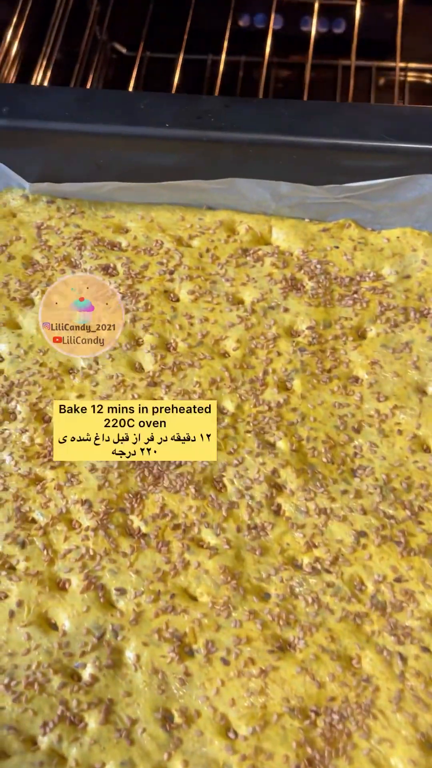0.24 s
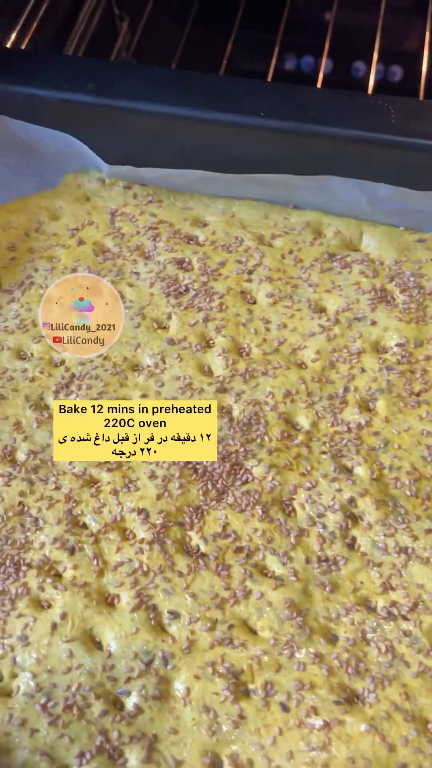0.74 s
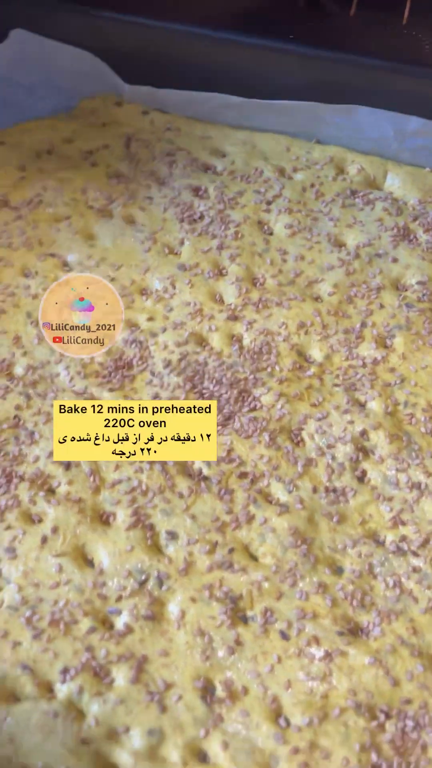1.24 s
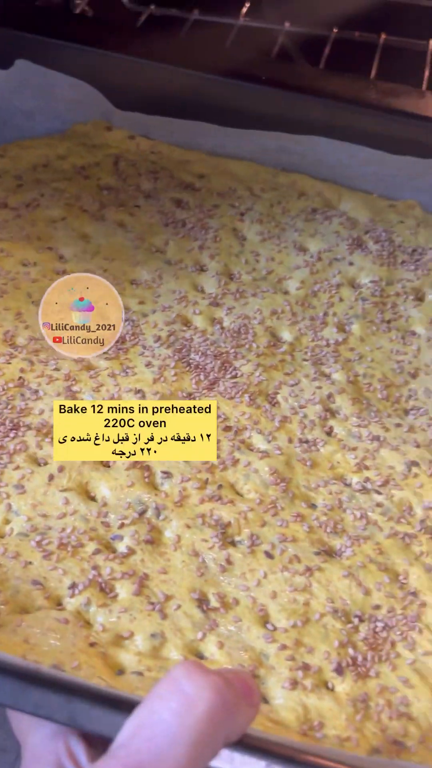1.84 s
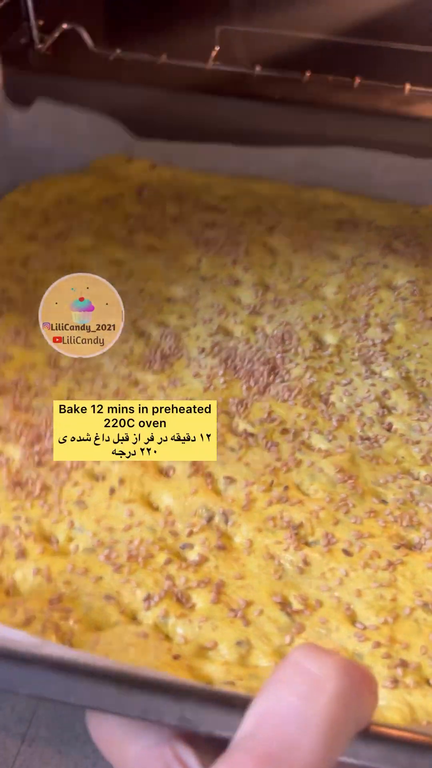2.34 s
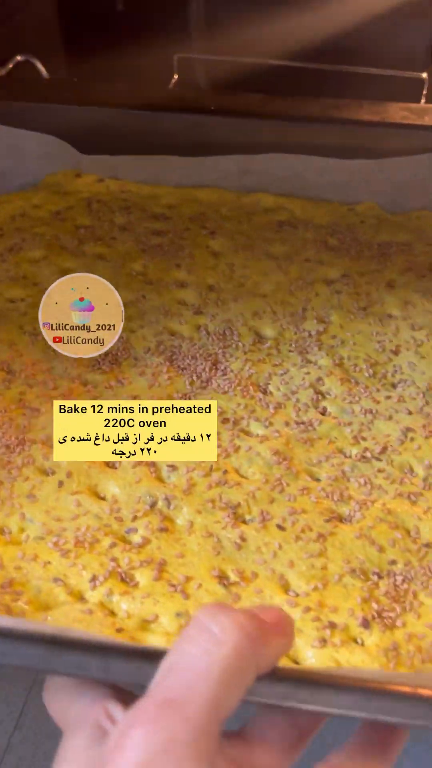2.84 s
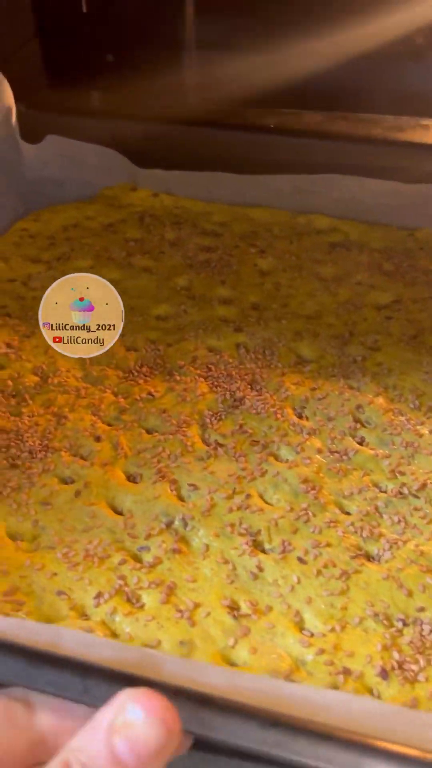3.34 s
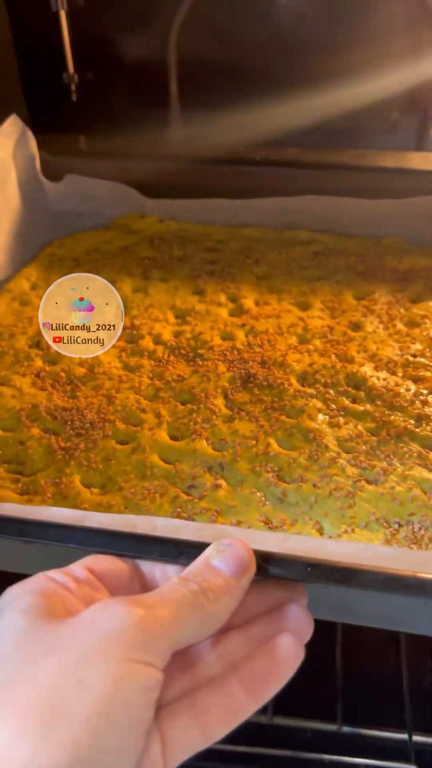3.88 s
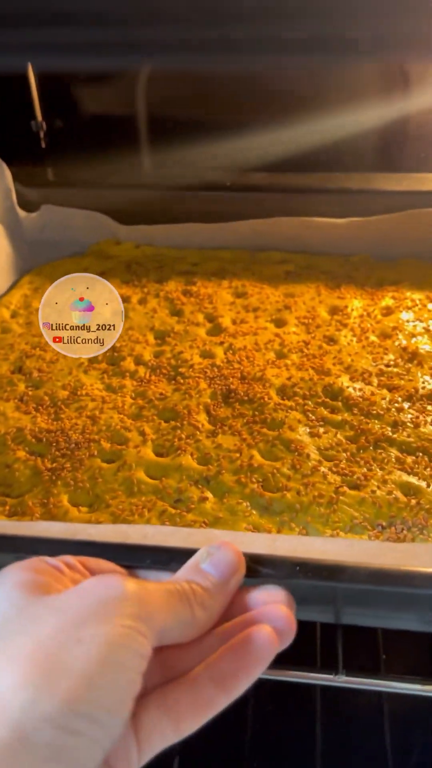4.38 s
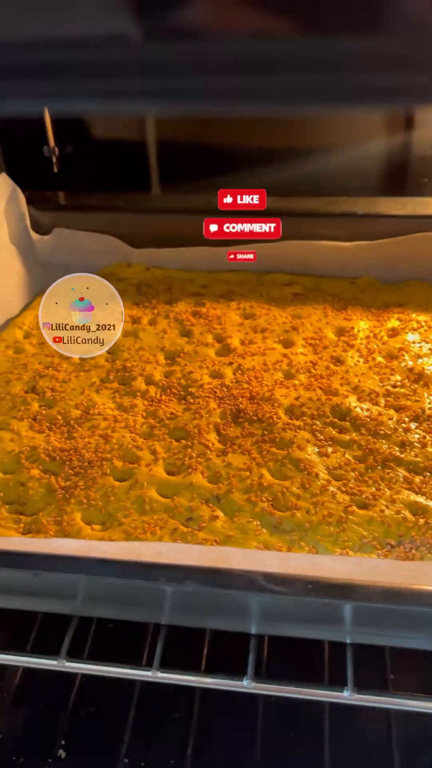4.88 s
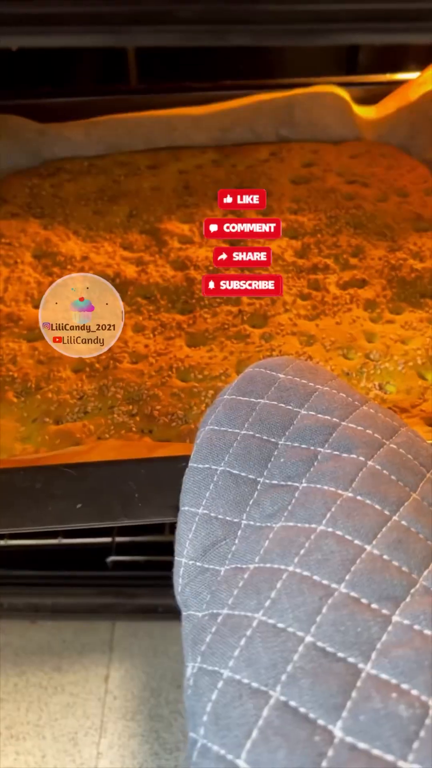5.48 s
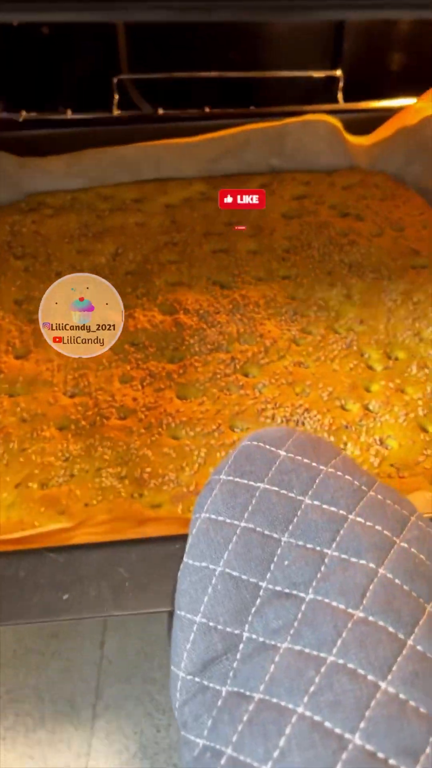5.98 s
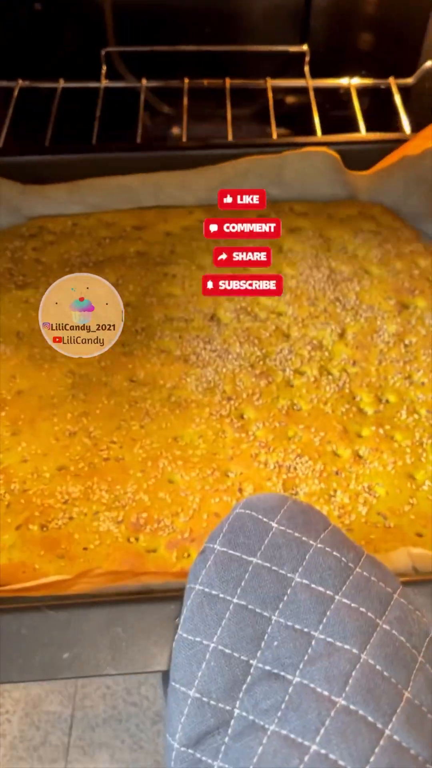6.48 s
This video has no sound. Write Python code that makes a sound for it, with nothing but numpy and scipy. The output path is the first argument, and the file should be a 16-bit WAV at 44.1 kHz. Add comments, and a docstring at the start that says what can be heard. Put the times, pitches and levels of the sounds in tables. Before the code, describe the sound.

A close handheld phone hears an open oven in a home kitchen. Quiet fan air, low rumble and faint wavering whistles run throughout, swelling with the wash of the blows. Two faint ticks come before 1 s. From 1.2 to 2.0 s a loaded metal tray clatters on the rack in a quick uneven run, with a hard hollow clank near 1.7 and a sharper one with a short scrape near 1.86. At 2.3 to 2.65 s comes the loudest burst: bangs, a bright gritty slide and deep oven boom. Tiny taps follow around 3.0 and 3.3. At 3.6 to 3.7 s a heavy dull thud lands with a low rumbling slide, then smaller knocks at 4.1 to 4.25. Fan noise dominates, with a soft low bump at 5.1 and a barely audible scrape at 5.9. Light clanks and short scrapes close it from 6.4 to 6.65.

```python
"""Loaded baking tray on an oven rack

A loaded tray is set on the rack, knocked, slid in and later drawn out, close to a handheld phone.
Blows ring the dense modes of the tray sheet and boom in the few low modes of rack and oven.
Slides drive the same modes with random stick-slip contacts.
Behind them, shaped noise with whistling bands gives the rumble, roar and hiss of the oven fan
through the open door, together with the reverberant wash after blows.
"""
import sys
import numpy as np
from scipy import signal
from scipy.io import wavfile
from scipy.ndimage import uniform_filter1d

SR = 44100
rng = np.random.default_rng(int(sys.argv[2]) if len(sys.argv) > 2 else 0)


def write(x):
    x = np.atleast_2d(x).T
    wavfile.write(sys.argv[1], SR, np.round(np.clip(x, -1, 1) * 32767).astype(np.int16))


N = 296352

# Blows of tray on rack. Each row: start in seconds, clank level in dB, boom level in dB,
# hardness (spectral tilt) in dB per octave, ring length as a factor, boom centre in Hz, favoured tone in Hz.
BLOW_EVENTS = [(0.463, -46.5, -47, 6, 0.86, 121, 4220), (0.885, -42, -35, 3.5, 0.74, 106, 4930),
               (1.213, -24, -20, 2, 1.13, 106, 3460), (1.368, -21.5, -21, 1.05, 1.07, 92.6, 523),
               (1.475, -28, -28.5, -2.5, 0.94, 372, 2600), (1.558, -26, -25.5, -2.5, 0.76, 102, 2340),
               (1.646, -32.5, -20.5, -4, 0.75, 105, 840), (1.675, -8.5, -19.5, 1, 0.62, 350, 371),
               (1.733, -24, -21.5, -0.5, 0.79, 219, 4200), (1.772, -25.5, -29, 0.5, 0.76, 135, 4250),
               (1.798, -24.5, -25, 0.4, 0.86, 94, 4220), (1.857, -13.5, -19, -0.7, 0.66, 105, 1320),
               (1.904, -25.5, -36, 1, 0.85, 320, 2400), (2.016, -30.5, -58, -4, 2.1, 333, 2280),
               (2.088, -37.5, -53, 7, 2.5, 213, 6400), (2.289, -10.5, -18, -2.5, 0.35, 440, 845),
               (2.328, -11, -7.5, 1, 0.32, 86, 8720), (2.345, -17, -8.5, 12, 0.81, 170, 4950),
               (2.391, -14.5, -19, 3, 0.86, 86, 4720), (2.436, -13.5, -18, 5.5, 4.6, 89, 8170),
               (2.501, -16, -15, 5.5, 0.78, 268, 1020), (2.645, -24, -41, -2, 0.74, 385, 4600),
               (2.963, -37, -39, -3, 0.67, 107, 1470), (3.001, -36.5, -35, 3, 0.87, 396, 4500),
               (3.053, -40, -36, -1.5, 2.2, 108, 2480), (3.343, -36.5, -29.5, -4.5, 0.73, 104, 2120),
               (3.608, -23, -14, 0, 0.89, 107, 1350), (3.682, -11, -7, -3.5, 1.07, 101, 246),
               (3.765, -32, -31, 4.5, 1.5, 88, 8500), (4.133, -24, -19, 3, 0.8, 101, 730),
               (4.185, -29, -24, -2.5, 0.65, 119, 2760), (4.245, -38, -43, -5, 0.77, 118, 2400),
               (5.116, -33, -25.5, -4.5, 1.25, 164, 446), (5.173, -41, -24, -6, .7, 138, 590),
               (6.412, -33, -38, 0.5, 0.54, 124, 1120), (6.447, -23, -20.5, 1.5, 1.65, 255, 2647),
               (6.525, -24.5, -18.5, -2, 1, 150, 4360), (6.645, -27, -30, -4, 0.66, 242, 1010)]


def blows(modes, tone_lift_db=12.5):
    """Each knock rings the sheet (clank) and the rack (boom); the spot struck favours one tone."""
    out = np.zeros((2, N))
    for start_s, clank_db, boom_db, hardness_db_per_oct, length, boom_hz, tone_hz in BLOW_EVENTS:
        sheet_ring = clank(modes, hardness_db_per_oct, length, (tone_hz,), tone_lift_db)
        add(out, start_s, gain_of(clank_db) * sheet_ring)
        add(out, start_s, gain_of(boom_db) * boom(boom_hz, length=1))
    return out


# Ring of the tray sheet before hand and load shorten it. Each row: frequency in Hz, t60 in seconds.
SHEET_FREE_T60 = [(300, 0.66), (1000, 0.69), (3000, 0.55), (7000, 0.16), (14000, 0.21)]


def sheet_modes(count=600, length_samples=12000):
    """The dense, evenly spread modes of the tray sheet as dying rotations."""
    hz = 250 + 15800 * (np.arange(count) + rng.random(count)) / count
    t = np.arange(length_samples) / SR
    rate = 2j * np.pi * hz - np.log(1000) / read(SHEET_FREE_T60, hz)
    return hz, np.exp((rate[:, None] * t).astype(np.complex64))


# Tray clank spectrum as heard, with a gap near 12-14 kHz that is not the tray's own.
# Each row: frequency in Hz, relative level in dB per mode.
CLANK_SPECTRUM = [(120, -29), (200, 6.5), (867, -2), (1100, -2), (1450, -5), (2610, -6), (4040, -9.5),
                  (4770, -10.5), (5230, -10), (9750, -11), (11500, -17), (12800, -35.5), (16000, -28.5)]
# Groups of sheet modes that stand out. Each row: centre in Hz, width in Hz, lift in dB.
SHEET_GROUPS = [(1160, 69, 0.5), (1760, 40, 1.5), (2590, 100, 4), (3370, 80, 0.5), (4300, 49, -0.5),
                (4720, 180, 5.5), (6040, 76, -3), (7900, 150, 2)]


def clank(modes, hardness_db_per_oct, length, tones_hz=(), tone_lift_db=0, scatter_db=2.5, crack=.6):
    """One contact rings every sheet mode by chance, after a short crack; hand and load shorten the ring."""
    hz, rings = modes
    lift_db = sum(db * hump(hz, f, width) for f, width, db in SHEET_GROUPS)
    lift_db = lift_db + sum(tone_lift_db * hump(hz, f, 70 + 0.017 * f) for f in tones_hz)
    a, b, c, d, chance = rng.standard_normal((5, len(hz)))
    tilt_db = hardness_db_per_oct * np.log2(hz / 2000)
    size = gain_of(read(CLANK_SPECTRUM, hz) + lift_db + tilt_db + scatter_db * chance)
    strengths = size * ports(hz, a + 1j * b, c + 1j * d)
    sound = (strengths.astype(np.complex64) @ rings).real
    t = np.arange(sound.shape[1]) / SR
    damping = np.exp(-t / (0.044 * length ** 2))
    onset = (1 - np.exp(-t / 0.00078)) * (1 + crack * np.exp(-t / 0.0012))
    return sound * damping * onset / np.sqrt(np.sum(size ** 2))


# Modes of rack and oven walls. Each row: frequency in Hz, relative level in dB, t60 at length 1 in seconds.
RACK_MODES = [(73, -1.5, 0.29), (92.9, -2.5, 0.49), (116.8, -2, 0.28), (141.7, -4, 0.42),
              (181.2, -2.5, 0.28), (226.3, -3, 0.31), (252.8, -6, 0.43), (323, -20, 0.099),
              (388.2, -4, 0.17), (428, -28, 0.27), (521.5, -13, 0.36), (632, -24, 0.16), (694, -10.5, 0.64)]


def boom(centre_hz, length, focus_db_per_oct=16.5, loose_turns=0.27, swing_s=.02):
    """Rack and oven walls take up a blow slowly and ring low, favouring modes near the centre pitch."""
    hz, db, t60_s = np.transpose(RACK_MODES)[:, :, None]
    db = db - focus_db_per_oct * abs(np.log2(hz / centre_hz))
    t = np.arange(22000) / SR
    # modes fall nearly in step at swing_s, the first full swing
    turn = loose_turns * rng.random((len(RACK_MODES), 1))
    swings = np.cos(2 * np.pi * (hz * (t - swing_s) + turn))
    rings = gain_of(db - 60 * t / (t60_s * length)) * swings
    take_up = (1 - np.exp(-t * 160)) ** 2
    return rings.sum(0) * take_up / np.linalg.norm(gain_of(db))


# Strokes of sliding. Each row: start in seconds, hold in seconds, scrape level in dB, rumble level in dB,
# scrape fade in dB per second, brightness before the fade from 0 to 1, rumble centre in Hz.
SLIDE_STROKES = [(1.856, 0.024, -20, -26.5, 172, 0.52, 200), (2.268, 0.033, -24.5, -18, 350, 0.13, 150),
                 (2.326, 0.18, -16, -24.5, 183, 0.84, 160), (2.543, 0.029, -23.5, -28, 230, 0.78, 200),
                 (2.64, 0.015, -34.5, -29, 164, 0.07, 160), (3.69, 0.13, -35.5, -25, 218, 0.12, 117),
                 (4.191, 0.017, -43, -30.5, 175, 0.3, 126), (5.11, 0.0089, -42, -35.5, 161, 0.9, 145),
                 (5.87, .04, -44, -47.5, 248, 0.53, 126), (6.405, 0.017, -31.5, -47, 304, 0.77, 190),
                 (6.446, .015, -26, -28, 220, .5, 245), (6.52, 0.064, -38.5, -30.5, 200, 0, 153)]


def slides(modes, slips_per_s=800, uneven_db=5.5, stutter_db=3.0):
    """Tiny stick-slip contacts in clumps at three points of the tray bottom; the rack rumbles along."""
    rise_s, fade_span_db = 0.0088, 30.5
    dulling_per_db, rumble_fade_share = 0.14, 0.66
    booms_hz = [85, 150, 270]
    count = len(booms_hz)
    out = np.zeros((2, N))
    for start_s, hold_s, top_db, low_db, fade_db_per_s, shine, rumble_hz in SLIDE_STROKES:
        t = np.arange(0, rise_s + hold_s + fade_span_db / fade_db_per_s, 1 / SR)
        faded_db = fade_db_per_s * np.maximum(t - rise_s - hold_s, 0)
        scrape_db, rumble_db = top_db - faded_db, low_db - rumble_fade_share * faded_db
        bright = np.clip(shine - dulling_per_db * faded_db, 0, 1)
        rise = np.minimum(t / rise_s, 1)
        # 1 = deep wall modes, 0 = rack wires
        depth = np.clip(np.log2(300 / rumble_hz) / np.log2(300 / 85), 0, 1)
        # the grip of the whole tray stutters, so all contact points swell together
        stutter = uniform_filter1d(rng.standard_normal(len(t)), 250)
        stutter = evened(uniform_filter1d(stutter, 250))
        for k, boom_hz in enumerate(booms_hz):
            sizes_db = uneven_db * np.minimum(rng.exponential(1, len(t)), 3) + stutter_db * stutter
            slips = gain_of(sizes_db) * (rng.random(len(t)) < slips_per_s / SR)
            slips = evened(slips * rng.choice([-1., 1.], len(t))) * rise / np.sqrt(count)
            # each contact favours its own tones
            tones_hz = rng.uniform([400, 1500, 4000], [1500, 4000, 9000])
            hard = clank(modes, 1.26, 0.55, tones_hz, 7.1)
            soft = clank(modes, -3.65, 0.87, tones_hz, 2.9)
            for share, ring in (bright, hard), (1 - bright, soft):
                drive = slips * gain_of(scrape_db) * np.sqrt(share)
                scrape = signal.fftconvolve(drive[None], ring / np.linalg.norm(ring[0]), axes=1)
                add(out, start_s, scrape)
            ring = boom(boom_hz, 0.52, focus_db_per_oct=11.0)
            share = np.maximum(1 - abs(2 * depth - 2 + k), .05)
            drive = slips * gain_of(rumble_db) * np.sqrt(count * share)
            add(out, start_s, signal.fftconvolve(drive, ring / np.linalg.norm(ring)))
    return out


# Background level: fan air noise together with the reverberant wash after blows.
# Each row: time in seconds, roar in dB, hiss in dB.
BACKGROUND_LEVELS = [(0, -60, -56), (.4, -58.5, -52.5), (1.1, -53, -48.5), (1.7, -41.5, -46),
                     (2.2, -42.5, -47.5), (2.8, -40, -45), (3.2, -47, -46), (3.6, -44.5, -45.5),
                     (4.2, -46, -49.5), (5.0, -48, -47.5), (5.35, -46.5, -50), (5.75, -46.5, -45.5),
                     (6.3, -51, -47.5), (6.72, -41, -46)]
# Rumble, roar and hiss as heard; the hiss has a gap near 12-14 kHz that is not the fan's own.
# Each row: frequency in Hz, relative level in dB per Hz.
RUMBLE_AS_HEARD = [(15, -45.5), (25, -20), (40, -7), (92, 3.5), (146, -8), (178, -4), (239, -7.5),
                   (279, -13.5), (300, -23), (390, -48.5), (660, -120)]
ROAR_AS_HEARD = [(130, -11), (220, 3.5), (246, -4), (284, -3), (457, -6), (550, -11), (720, -10.5),
                 (884, -17.5), (1200, -19.5), (1560, -38), (2640, -120)]
HISS_AS_HEARD = [(530, -43), (900, -7), (1410, -3), (1790, -1.5), (2120, -3), (2660, 1), (3430, -3.5),
                 (4310, -3.5), (10000, 0.5), (11700, -6.5), (12400, -35), (14200, -12), (16000, -7.5)]
# Whistling bands of the fan housing. Each row: mean centre in Hz, width in Hz,
# mean lift far from the door in dB, mean lift near it in dB.
WHISTLES = [(102, 31, 7.5, 2), (430, 50, -0.5, 2), (594, 26, 17, 3), (673, 26, 10.5, 4),
            (823, 29, 12.5, -2.5), (1754, 69, 13.5, 6.5), (1990, 64, 4, 5), (2415, 175, 2.5, 6.5),
            (2698, 54, 9.5, 13.5), (2883, 54, 14.5, 5), (2940, 39, 6, 9), (4084, 79, 7.5, 9),
            (4345, 57, 15.5, 14.5), (6470, 140, -4, 5.5), (8540, 130, 3, 5.5), (10070, 150, 9.5, 6.5)]
# The phone nears the door. Each row: time in seconds, nearness from 0 to 1.
NEARNESS = [(.6, 0), (4.4, 1)]


def fan_and_wash(patchy_db=1.5, gusty_db=1.64, waver=0.0091, flutter=0.21):
    """Noise of fan air and wash: lumpy rumble, roar and hiss; wavering whistles shift with nearness."""
    window, hop = 2048, 512
    frames, hz = N // hop + 5, np.fft.rfftfreq(window, 1 / SR)[:, None]
    t = np.arange(frames) * hop / SR
    s, *columns = np.transpose(BACKGROUND_LEVELS)
    roar_db, hiss_db = (np.interp(t, s, c) for c in columns)
    rumble_db = -42.5 + 0.53 * (roar_db + 48)  # follows the roar by a share
    near = np.interp(t, *np.transpose(NEARNESS))

    a, b, c, d, patches = rng.standard_normal((frames, len(hz), 5)).T
    patches = evened(uniform_filter1d(uniform_filter1d(patches, 16, 0), 7, 1))
    gusts = evened(uniform_filter1d(rng.standard_normal(frames), 5))
    drift, swell = (evened(uniform_filter1d(rng.standard_normal((len(WHISTLES), frames)), 15))
                    for _ in range(2))

    lift_db = 0
    for k, (centre_hz, width_hz, far_db, near_db) in enumerate(WHISTLES):
        band_db = (far_db + near * (near_db - far_db)) * (1 + flutter * swell[k])
        lift_db = lift_db + band_db * hump(hz, centre_hz * (1 + waver * drift[k]), width_hz)

    power = 0
    for spectrum, db in ((RUMBLE_AS_HEARD, rumble_db + gusty_db * gusts),
                         (ROAR_AS_HEARD, roar_db + .5 * gusty_db * gusts),
                         (HISS_AS_HEARD, hiss_db)):
        colour = gain_of(read(spectrum, hz) + lift_db)
        colour = colour / np.sqrt(np.mean(np.sum(colour ** 2, 0)))
        power = power + (colour * gain_of(db)) ** 2

    def to_sound(z):
        return signal.istft(z, nperseg=window, noverlap=window - hop)[1]

    unit = np.std(to_sound((a + 1j * b) / np.sqrt(len(hz))))
    z = ports(hz, a + 1j * b, c + 1j * d) * np.sqrt(power) * gain_of(patchy_db * patches) / unit
    return to_sound(z)[:, :N]


# The two microphone ports. Each row: frequency in Hz, left-right likeness from 0 to 1,
# phase by which the right leads in radians.
PORT_PAIR = [(60, 1.0, 0.0), (200, 0.99, 0.052), (350, 0.99, -0.051), (700, 0.85, 0.077),
             (1190, 0.6, -0.013), (1720, 0.93, 0.25), (2180, 1, -1.3), (2610, 0.71, -0.084),
             (3500, 0.14, -0.91), (3950, 0.74, 0.032), (5730, 0.36, 1.26), (7000, 0.88, 1.19),
             (9550, 0.73, 1.41), (12400, 0.24, 0.83), (14500, .5, 1.8)]


def ports(hz, left, other):
    """Left and right spectra: partly alike, with a phase step between the ports."""
    f, same, lead_rad = np.transpose(PORT_PAIR)
    same = np.clip(read(np.c_[f, same], hz), 0, 1)
    lead_rad = read(np.c_[f, lead_rad], hz)
    right = same * left * np.exp(1j * lead_rad) + np.sqrt(1 - same ** 2) * other
    return np.array([left, right])


def gain_of(db):
    """Decibels to gain."""
    return 10 ** (np.asarray(db) / 20)


def evened(x):
    """Scales to rms 1."""
    return x / np.sqrt(np.mean(x ** 2) + 1e-20)


def read(points, hz):
    """Reads a table on a log-frequency axis."""
    f, value = np.transpose(points)
    return np.interp(np.log(hz + 1), np.log(f + 1), value)


def hump(hz, centre_hz, width_hz):
    """A resonance shape of height 1."""
    return 1 / (1 + (2 * (hz - centre_hz) / width_hz) ** 2)


def add(mix, start_s, sound):
    """Mixes a one- or two-channel sound into both channels at start_s."""
    part = mix[:, round(start_s * SR):][:, :sound.shape[-1]]
    part += sound[..., :part.shape[1]]


def scene():
    """Tray and rack over the fan and wash."""
    modes = sheet_modes()
    return blows(modes) + slides(modes) + fan_and_wash()


# The level dips briefly. Values: centre in seconds, width in seconds, depth in dB.
LEVEL_DIP = (5.315, .012, -9)


def record(dry, bass_edge_hz=48, overload=1.6, top_edge_hz=16100):
    """A brief dip in level, the microphone's bass roll-off, a soft overload and the band limit."""
    dip_s, width_s, dip_db = LEVEL_DIP
    t = np.arange(N) / SR
    dipped = dry * gain_of(dip_db * np.exp(-((t - dip_s) / width_s) ** 2))
    thinned = signal.sosfilt(signal.butter(2, bass_edge_hz, "high", fs=SR, output="sos"), dipped)
    soft = overload * np.tanh(thinned / overload)
    band_limit = signal.firwin(511, top_edge_hz, window=("kaiser", 9), fs=SR)
    return signal.oaconvolve(soft, band_limit[None], "same")


dry = scene()
out = record(dry)
write(out)
```